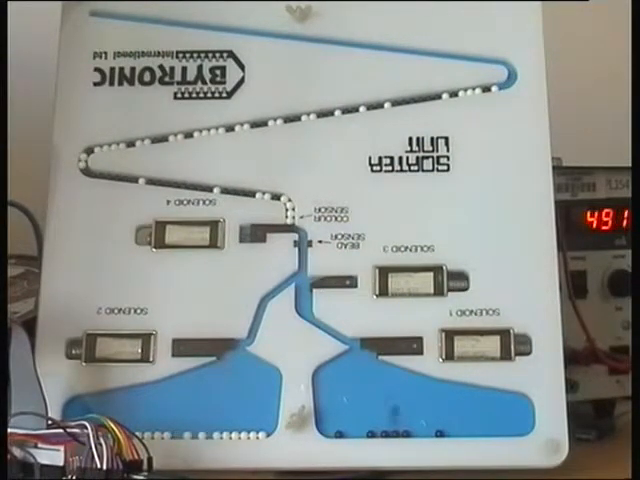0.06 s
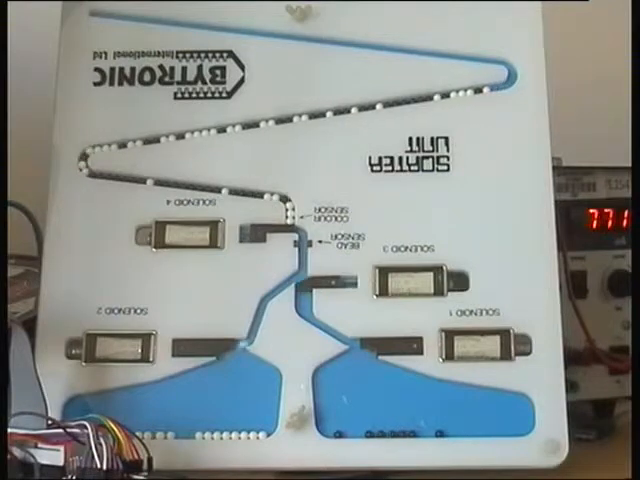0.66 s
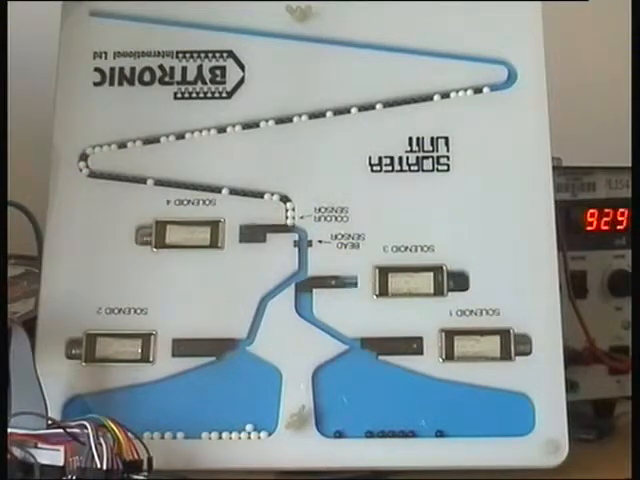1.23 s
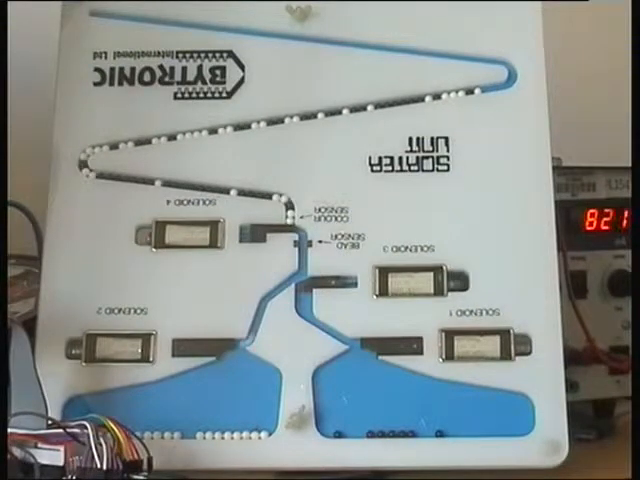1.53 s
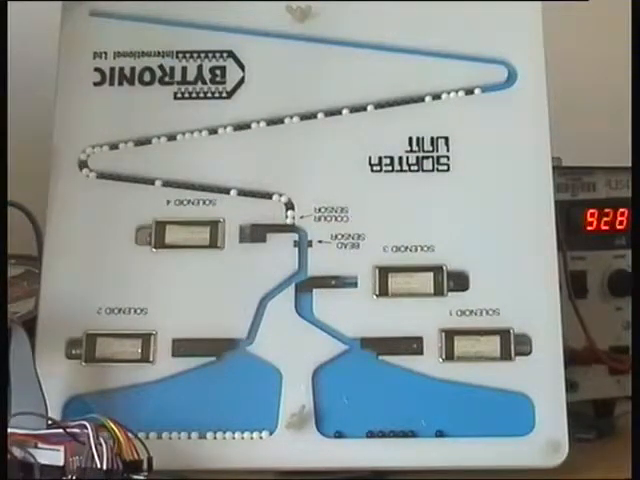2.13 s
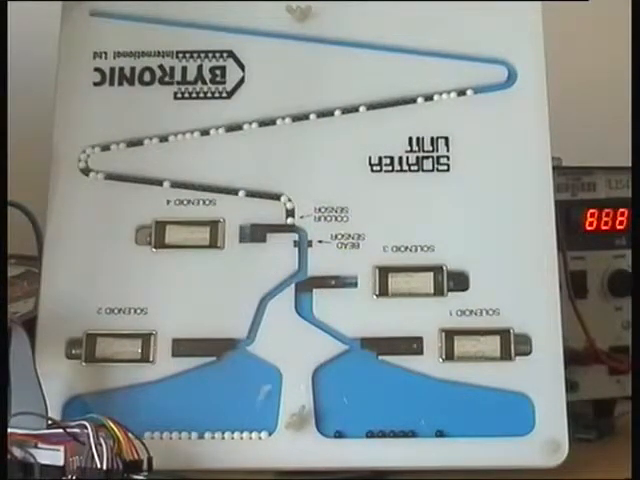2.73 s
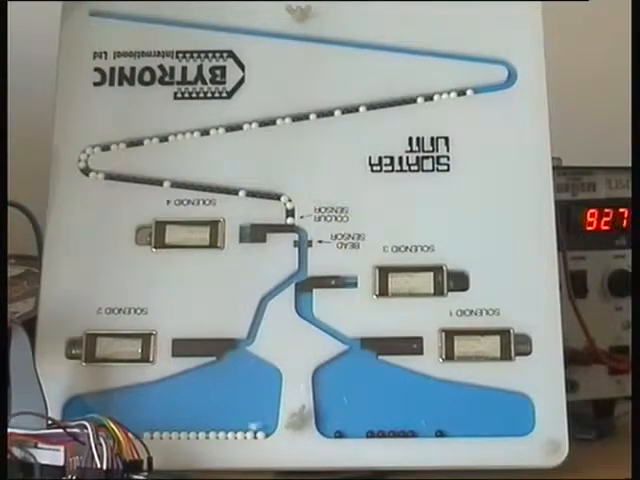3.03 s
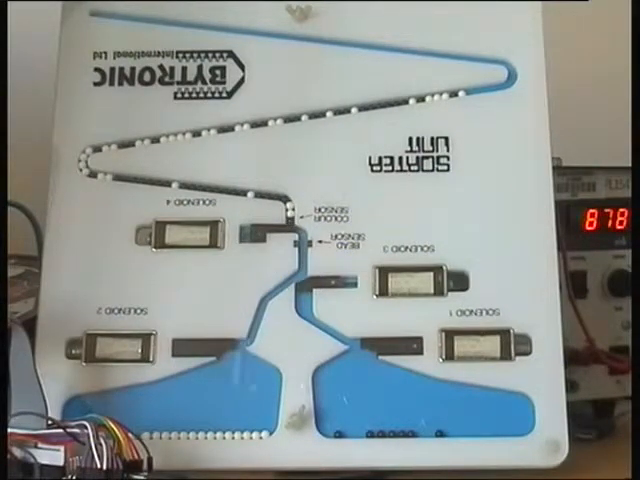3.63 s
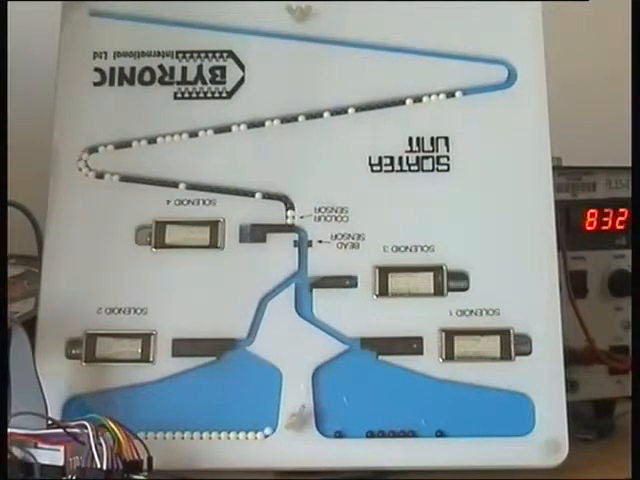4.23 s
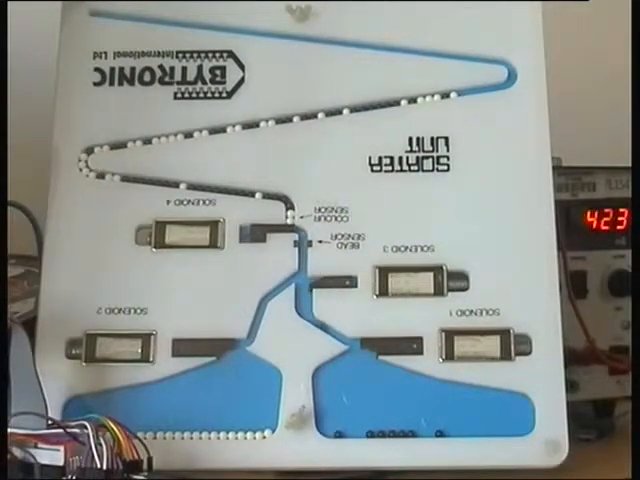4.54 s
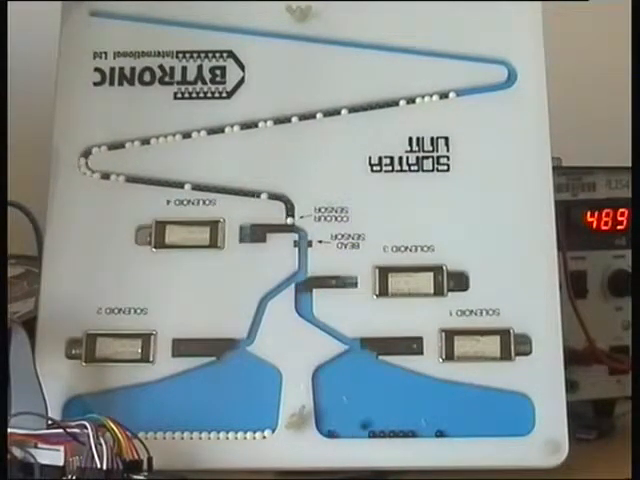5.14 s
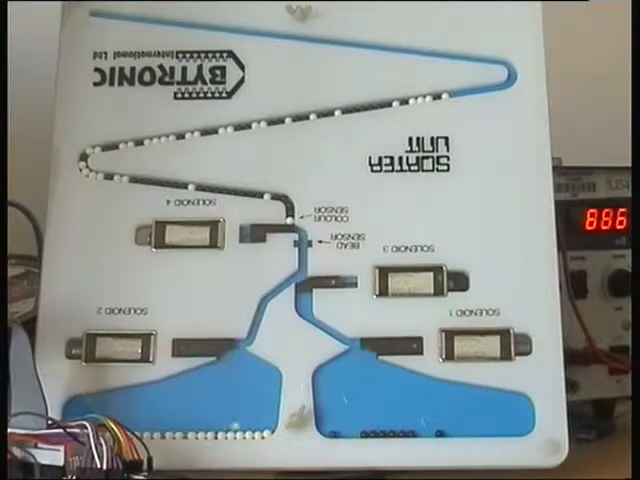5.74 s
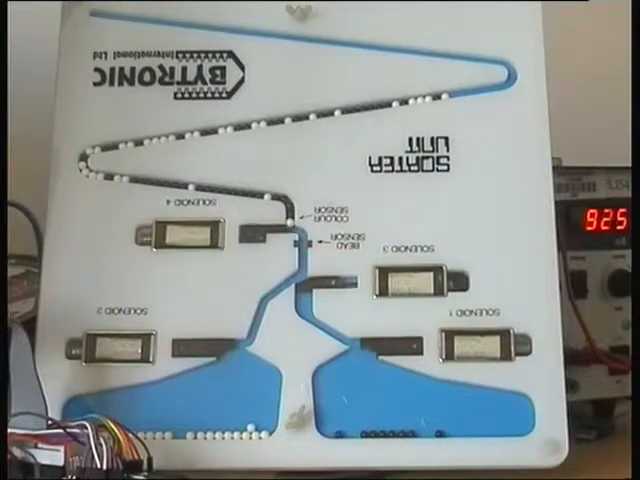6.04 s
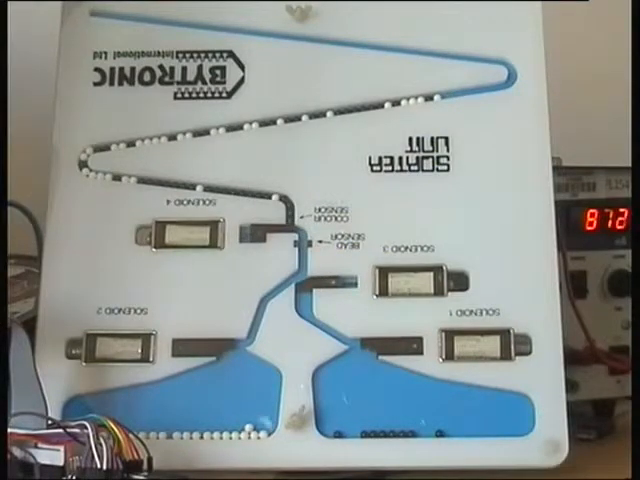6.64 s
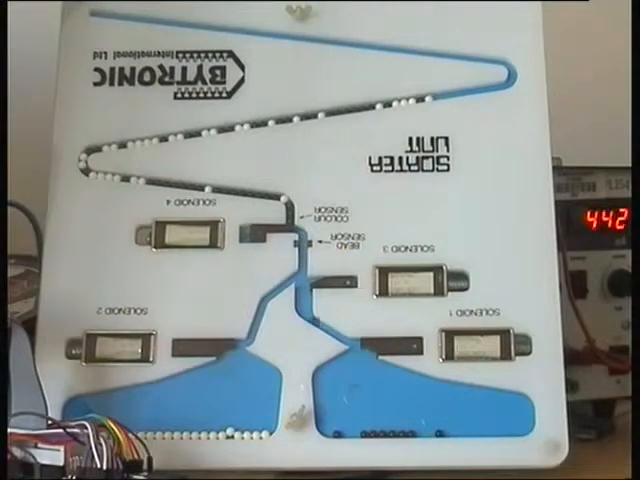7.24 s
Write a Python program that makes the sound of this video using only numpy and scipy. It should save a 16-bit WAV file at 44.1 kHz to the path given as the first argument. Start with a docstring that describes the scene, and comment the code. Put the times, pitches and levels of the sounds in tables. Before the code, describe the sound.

Over the faint, steady hum and hiss of a power supply and fan, a solenoid snaps roughly once a second in a small room. Each snap is joined by a quick knock from a sorting gate and is usually answered a third of a second later by a briefly ringing steel click. Much quieter, tiny beads jostle as they wait and drop into bins with bright, bouncing ticks.

```python
"""A solenoid (a coil that pulls in a steel plunger) slams home about once a second in a bead sorter.
A sorting gate then knocks against the plastic board, and the plunger, unless it is held in, springs back
with a short steel ring. Twice, a steely clack like that release sounds together with the slam.
Small beads jostle in a queue and bounce in the bins. The machine stands on a bench in a small room,
where a power supply and a fan hum under a faint hiss."""
import sys
import numpy as np
from scipy import signal
from scipy.fft import rfft, irfft, next_fast_len
from scipy.io import wavfile
from scipy.ndimage import uniform_filter1d

SR = 44100
rng = np.random.default_rng(int(sys.argv[2]) if len(sys.argv) > 2 else 0)


def digitize_waveform(pressure):
    """Quantize a signal to 16-bit integers and store it at the path in sys.argv[1].

    Rows of a 2-D input are taken as channels; values are limited to [-1, 1].
    """
    field = np.atleast_2d(pressure).T
    bounded = np.clip(field, -1, 1)
    quanta = np.round(bounded * 32767).astype(np.int16)
    wavfile.write(sys.argv[1], SR, quanta)


N = 321048

# Levels in dB are relative. A fade time (t60) is how long a sound takes to drop by 60 dB.
# The tones of the hum. Each row: pitch in Hz, level in dB.
HUM_TONES = [(81, -84), (242, -84), (301.5, -71.5), (511, -77), (598, -79.5), (899, -76.5), (937, -73.5),
             (1200, -84), (4697, -76)]
# Two close pitches in Hz that throb against each other.
THROB_HZ = (120, 121.37)
# How long the room echoes. Each row: frequency in Hz, fade time in seconds.
ROOM_FADE = [(150, 0.31), (500, 0.21), (2000, 0.34), (5000, 0.32), (9000, 0.27), (14000, 0.25)]
# How wide the hiss, the echo and the direct sound are.
# Each row: frequency in Hz, level of the sides against the middle in dB.
HISS_WIDTH = [(100, -13), (500, -7.5), (1500, -4), (6000, 0.5)]
ROOM_WIDTH = [(300, -22), (700, -10.5), (1500, -4.5), (5000, -1.5), (13000, -3)]
DIRECT_WIDTH = [(300, -24), (1000, -24), (3000, -18), (8000, -6), (13000, -8)]
# Where the direct sound leans. Each row: frequency in Hz, left against right in dB.
LEFT_LEAN = [(100, 1.5), (400, 2), (1300, 1), (4400, -0.5), (8500, -1.5), (10500, 0.5), (12400, 3)]

# The tone colour of each sound, from bass to treble. Each row: frequency in Hz, level in dB.
HISS_COLOUR = [(15, -54), (25, -14), (116, -6), (178, -7), (410, -3), (648, -9), (945, -7.5), (2120, -13.5),
               (2300, -17.5), (2490, -15), (4620, -12.5), (5730, -24), (9550, -17), (13200, -28),
               (15500, -48)]
QUEUE_COLOUR = [(1000, -14.5), (4000, -11), (7000, -7), (13000, -11.5), (15000, -26)]
BEAD_COLOUR = [(30, -44), (1200, -15), (2200, -12.5), (4000, -9.5), (6500, -2.5), (10000, 3), (11300, -7.5),
               (13000, 1), (15000, -29)]
GATE_COLOUR = [(30, -11), (100, -16.5), (280, -7), (420, -2.5), (800, 2.5), (1300, -2), (2800, -4),
               (5000, 3), (8000, 0.5), (11300, -11), (13000, 0.5), (15000, -31)]
SCRAPE_COLOUR = [(100, -16), (500, -1.5), (1800, 2.5), (3500, -1), (8000, -3.5), (11300, -8), (13000, -10),
                 (15000, -30)]
RELEASE_COLOUR = [(30, -18.5), (100, -29.5), (280, -24), (420, -13.5), (800, -3), (1300, -13.5),
                  (2800, -10.5), (5000, -1), (8000, 0), (11300, -6), (13000, 2), (15000, -27)]
PULL_COLOUR = [(30, -39), (100, -24), (280, -23.5), (420, -28), (800, -6), (1300, -3.5), (2800, -3.5),
               (5000, 1), (8000, 1.5), (11300, -6.5), (13000, -5), (15000, -22)]
# Modes are the pitches at which a struck part rings. Each row: pitch in Hz, width in Hz, boost in dB.
QUEUE_MODES = [(6940, 1600, 5)]
PING_MODE = (6900, 2000, 15)  # a single row: one bead against the next
BEAD_MODES = [(2090, 420, 4.6), (2400, 440, 6), (3230, 800, 5.6), (6380, 1100, 5.8)]
GATE_MODES = [(386, 79, 11.3), (475, 115, 10.9), (760, 96, 5.3), (1087, 38, 9.9), (1327, 62, 7.6),
              (1655, 230, 7.6), (2003, 61, 5.2), (3480, 340, 6.6), (10050, 1430, 8)]
LATE_RELEASE_MODES = [(2810, 260, 8.5), (3460, 340, 16), (3790, 130, 13.5), (7380, 600, 5), (12260, 490, 9)]
RELEASE_MODES = [(232, 250, 6.5), (1025, 58, 4.8), (1563, 460, 10.1), (1995, 85, 6.4), (2230, 210, 6.1),
                 (2500, 160, 6.3), (3397, 350, 8.1), (3534, 425, 7), (3820, 210, 9.1), (4470, 73, 9.5),
                 (7450, 380, 4.1), (8984, 140, 8.9), (12120, 420, 8.7)]
PULL_MODES = [(403, 127, 26), (516, 72, 4), (700, 41, 5.5), (770, 146, 6.5), (1970, 170, 6.5),
              (2198, 94, 5.5), (2820, 190, 3.5), (3320, 600, 6), (3740, 57, 7.5), (4110, 230, 2),
              (4490, 330, 4), (6850, 670, 4.5), (13200, 200, 1)]
# Steel that rings on: the plunger with its spring, and the solenoid's frame.
# Each row: pitch in Hz, level in dB, fade time in seconds.
PLUNGER_RING = [(3335, -21, 0.19), (3540, -10, .24), (3705, -6, 0.14), (3820, 1.5, 0.27), (3940, -8, 0.28),
                (4100, -10, 0.35), (5000, -14, 0.18), (5760, -13, .2), (7250, -14, 0.18), (7540, -19, 0.11),
                (12200, 0, .1), (12200, -4, .1)]
FRAME_RING = [(1810, -1.5, 0.16), (3515, -5, 0.11), (3870, -6, 0.2), (4520, -5, .2), (4810, 2, 0.21),
              (4730, 0, 0.16), (5460, -18, 0.086), (6860, -24, 0.1), (7300, -27, 0.12), (7800, -3, 0.15),
              (7500, -3, 0.12)]
# A blow, then its repeats from rebounds and off the bench. Each row: delay in seconds, level in dB.
REPEATS = [(0, -1), (.0031, -2), (.0095, -8)]

# A bead runs into the waiting queue.
# Each row: start in seconds, click level in dB, shuffle level in dB, shuffle fade time in seconds.
NUDGES = [(0.0, -54, -54, 1.2), (0.497, -45, -58, 1.2), (4.295, -40, -52, 1.3), (4.373, -43, -58, 1),
          (4.451, -46, -63, 0.88), (4.639, -46, -56, .4), (4.6577, -37, -50, 0.35), (4.8192, -44, -54, 2),
          (5.259, -43, -52, 1), (6.7392, -37, -53, 0.92), (7.21, -40, -47, .6)]
# A sorted bead drops into its bin. Each row: start in seconds, level in dB, first flight in seconds,
# second flight as a share of the first, loss per bounce in dB, rattle in seconds, bass boost in dB.
DROPS = [(0.0794, -32, .0976, .735, 3, 0, 7), (0.8003, -23.5, .145, .578, 7, .15, 2),
         (1.7862, -25, .1393, .416, 6, .15, 1), (2.7306, -25.5, .152, .697, 6, 0, -6),
         (3.704, -24, .1405, .545, 9, .06, -2), (4.7618, -25, .1652, .765, 1.5, 0, 0),
         (5.6063, -28.5, .0917, .772, 4.5, .04, 0), (6.5207, -26.5, .129, .695, 9, 0, 1),
         (7.2058, -29, .14, .6, 6, 0, 5)]
# One sorting cycle per bead. Each row: start in seconds, slam level in dB, gate level in dB,
# treble boost in dB, kind ("white" is plain, "dark" adds a steely clack, "hold" keeps the plunger in).
CYCLES = [(0.2866, -10, -11, -4.5, "dark"), (1.2505, -5, -8, -4.5, "white"),
          (2.2121, -5.5, -7, -3, "white"), (3.1742, -6, -7.5, 0.5, "white"), (4.136, -5, -8, -5.5, "hold"),
          (5.076, -8, -10.5, -3, "dark"), (6.0405, -5, -7.5, -3, "white"),
          (7.0028, -4.5, -8.5, -4.5, "hold")]
GATE_LAG_S, RELEASE_LAG_S = 0.0667, 0.3418  # after the slam
DARK_DELAY_S = 0.003  # both come this much later in a "dark" cycle


def amp(db):
    """Turn decibels into a factor to multiply by."""
    return 10 ** (np.asarray(db) / 20)


def unit(x):
    """Scale a signal to an average (rms) level of 1."""
    return x / np.sqrt(np.mean(x ** 2) + 1e-20)


def along(points, hz):
    """Read between the rows of a table, on a logarithmic frequency scale."""
    frequencies, values = np.transpose(points)
    return np.interp(np.log(hz + 1), np.log(frequencies + 1), values)


def filtered(x, response):
    """Turn each frequency up or down by the factor response(hz)."""
    length = x.shape[-1]
    padded = next_fast_len(length + SR // 10)
    return irfft(rfft(x, padded) * response(np.fft.rfftfreq(padded, 1 / SR)), padded)[..., :length]


def add(track, start_s, x):
    """Mix a sound into the track at a given time."""
    start = max(round(start_s * SR), 0)
    part = x[..., :N - start]
    track[..., start:start + part.shape[-1]] += part


def stereo(pair, width):
    """Make left and right from two signals: one for the middle, one for the sides."""
    side = filtered(pair[1], lambda hz: amp(along(width, hz)))
    return np.array([pair[0] + side, pair[0] - side])


def body(x, colour, modes, size=4096):
    """A struck part colours the sound and rings at its modes."""
    hz = np.fft.rfftfreq(size, 1 / SR)
    peaks_db = sum(boost / (1 + (2 * (hz - pitch) / width) ** 2) for pitch, width, boost in modes)
    cepstrum = irfft(np.log(amp(along(colour, hz) + peaks_db)))
    # Folding the second half onto the first puts all the ringing after the hit.
    cepstrum[1:size // 2] *= 2
    cepstrum[size // 2 + 1:] = 0
    response = irfft(np.exp(rfft(cepstrum)))
    return signal.oaconvolve(x, response[None] / np.linalg.norm(response), axes=1)[:, :N]


def clatter(envelope, passes=4):
    """Two bursts of noise, evened out in pitch and in time, whose loudness follows the envelope."""
    burst = rng.standard_normal((2, len(envelope)))
    for _ in range(passes):
        spectrum = rfft(burst * envelope)
        even = irfft(spectrum / (np.abs(spectrum) + 1e-12), len(envelope))
        burst = even / np.sqrt(np.abs(uniform_filter1d(even ** 2, size=64)) + 1e-20)
    return burst * envelope


def blows(hits, t60, rise_s, repeat_db, bass_hz, treble_hz=10500):
    """Each hit is a short clatter with repeats; how the part seats sets its bass and treble."""
    track, t = np.zeros((2, N)), np.arange(SR // 10) / SR
    power = 0
    for k, (delay, db) in enumerate(REPEATS):
        age = np.maximum(t - delay, 0)
        fade = amp(db + repeat_db * (k > 0) - 60 * age / t60)
        power += (fade * (1 - np.exp(-age / rise_s))) ** 2
    for start, db, bass_db, treble_db in hits:
        bass = lambda hz: 1 + (amp(bass_db) - 1) / (1 + 1j * hz / bass_hz)
        treble = lambda hz: amp(treble_db * (1 - 1 / (1 + (hz / treble_hz) ** 8)))
        add(track, start, amp(db) * filtered(clatter(np.sqrt(power)), lambda hz: bass(hz) * treble(hz)))
    return track


def ringing(hits, tones):
    """Struck steel rings on, at slightly different pitches and strengths each time."""
    track, t = np.zeros((2, N)), np.arange(SR // 3) / SR
    for start, db, *_ in hits:
        for hz, tone_db, t60 in tones:
            phase = 2 * np.pi * (hz * rng.normal(1, 0.00204) * t + rng.random((2, 1)))
            fade = amp(db + tone_db + rng.normal(0, 0.75) - 60 * t / t60)
            add(track, start, fade * np.sin(phase))
    return track


def in_room(pair, echo_db, build_s):
    """The direct sound plus the room's soft echo, which builds up over about build_s seconds."""
    heard = filtered(stereo(pair, DIRECT_WIDTH),
                     lambda hz: amp(np.outer([0.5, -0.5], along(LEFT_LEAN, hz))))
    for start in range(0, N, SR):  # each second gets a fresh echo made of fading noise
        hz, t, noise = signal.stft(rng.standard_normal((2, SR // 3)), SR, nperseg=256)
        tail = signal.istft(noise * amp(-60 * t / along(ROOM_FADE, hz)[:, None]), SR, nperseg=256)[1]
        tail *= 1 - np.exp(-(np.arange(tail.shape[1]) / SR / build_s) ** 2)
        tail = stereo(tail / np.linalg.norm(tail[0]), ROOM_WIDTH)
        echo = signal.fftconvolve(pair[:1, start:start + SR], tail, axes=1)
        add(heard, start / SR, amp(echo_db) * echo)
    return heard


def hum_and_hiss(waver_cycles=0.28, throb_db=-73):
    """The power supply and a fan hum under an even hiss; two close low tones throb together."""
    t = np.arange(N) / SR
    hiss = unit(filtered(rng.standard_normal((2, N)), lambda hz: amp(along(HISS_COLOUR, hz))))
    hum = np.zeros(N)
    for hz, db in [*HUM_TONES, *[(hz, throb_db) for hz in THROB_HZ]]:
        drift = np.interp(t, np.linspace(0, t[-1], 40), rng.standard_normal(40))
        hum += amp(db) * np.sqrt(2) * np.sin(2 * np.pi * (hz * (t - 0.14) + waver_cycles * drift))
    return amp(-60.5) * stereo(hiss, HISS_WIDTH) + hum


def queue_motion(rest_db=-62.5):
    """How much the waiting beads move: each nudge stirs them up, and they never quite rest."""
    power, t = np.full(N, amp(rest_db) ** 2), np.arange(SR) / SR
    for start, _, db, t60 in NUDGES:
        add(power, start, amp(db - 60 * t / t60) ** 2)
    return np.sqrt(power)


def queue_jostle(motion, per_second=240, t60=0.021):
    """The waiting beads rustle as they touch in many tiny contacts."""
    contacts = (rng.random(N) < per_second / SR) * rng.uniform(-0.66, 1, N)
    touch = clatter(amp(-60 * np.arange(SR // 50) / SR / t60))
    rustle = unit(signal.fftconvolve(contacts[None], touch, axes=1)[:, :N])
    return body(amp(-6) * motion * rustle, QUEUE_COLOUR, QUEUE_MODES)


def queue_pings(motion, per_second=45, t60=0.008, roll_db=-7, click_db=1):
    """Beads knock together with a tiny ping: once at each nudge, then at random as they roll on."""
    knocks = (rng.random(N) < per_second / SR) * rng.uniform(0.5, 1, N)
    knocks *= amp(roll_db) * np.sqrt(SR / per_second) * motion
    touch = clatter(amp(-60 * np.arange(SR // 50) / SR / t60))
    track = signal.oaconvolve(np.array([knocks, knocks]), touch / np.linalg.norm(touch[0]), axes=1)[:, :N]
    for start, db, *_ in NUDGES:
        add(track, start, amp(db + click_db) * touch)
    return body(track, BEAD_COLOUR, [PING_MODE])


def bin_bounces(hop_s=0.034, hop_loss_db=2.1):
    """A bead lands and bounces twice; some then hop over the others in the bin, weaker each hop."""
    contacts = []
    for start, db, flight, shrink, loss_db, rattle_s, bass_db in DROPS:
        contacts += [(start, db, bass_db), (start + flight, db - loss_db, bass_db)]
        third_landing = start + flight * (1 + shrink)
        for hop in range(int(rattle_s / hop_s) + 1):
            contacts.append((third_landing + hop * hop_s, db - 2 * loss_db - hop * hop_loss_db, bass_db))
    hits = [(start, db, bass_db, 0.33 * (db + 32))  # harder hits are brighter
            for start, db, bass_db in contacts if start < N / SR]
    ticks = amp(-5) * blows(hits, t60=0.014, rise_s=0.00034, repeat_db=-3, bass_hz=3550)
    return body(ticks, BEAD_COLOUR, BEAD_MODES)


def beads():
    """Waiting beads rustle and ping, and falling ones tick sharply."""
    motion = queue_motion()
    sound = queue_jostle(motion) + bin_bounces() + queue_pings(motion)
    return in_room(sound, echo_db=-2, build_s=0.0012)


def gate_knock(bass_db=0, brighter_db=3):
    """Just after each slam the sorting gate stops against the board, which gives a hollow knock."""
    hits = [(start + GATE_LAG_S + DARK_DELAY_S * (kind == "dark"), db,
             bass_db, treble_db + brighter_db * (kind != "dark"))
            for start, _, db, treble_db, kind in CYCLES]
    force = amp(-9.5) * blows(hits, t60=0.04, rise_s=0.00014, repeat_db=-2, bass_hz=1510)
    return in_room(body(force, GATE_COLOUR, GATE_MODES), echo_db=-3.5, build_s=0.0021)


def late_release(level_db=-4, bass_db=1.5, treble_db=1.2):
    """In a "dark" cycle a short, steely clack like the plunger's release sounds with the slam."""
    hits = [(start, level_db, bass_db, treble_db) for start, *_, kind in CYCLES if kind == "dark"]
    force = amp(-5) * blows(hits, t60=0.024, rise_s=0.00035, repeat_db=-2, bass_hz=1500)
    clack = body(force, RELEASE_COLOUR, LATE_RELEASE_MODES)
    ring = amp(-42) * ringing(hits, PLUNGER_RING)
    return in_room(clack + ring, echo_db=-8, build_s=0.0038)


def plunger_scrape(hits, lead_s, t60):
    """The plunger breaks loose and scrapes along its tube just before each hit."""
    track, t = np.zeros((2, N)), np.arange(round(lead_s * SR)) / SR
    for start, db, *_ in hits:
        add(track, start - lead_s, amp(db - 60 * t / t60) * rng.standard_normal((2, len(t))))
    return body(track, SCRAPE_COLOUR, [])


def solenoid_release(level_db=-4, bass_db=-1.9, treble_db=0.9):
    """A timer frees the plunger unless it is held; the spring throws it out, always equally hard."""
    hits = [(start + RELEASE_LAG_S + DARK_DELAY_S * (kind == "dark"), level_db, bass_db, treble_db)
            for start, *_, kind in CYCLES if kind != "hold"]
    force = amp(-3.5) * blows(hits, t60=0.016, rise_s=0.00041, repeat_db=-0.5, bass_hz=1540)
    clack = body(force, RELEASE_COLOUR, RELEASE_MODES)
    ring = amp(-36.5) * ringing(hits, PLUNGER_RING)
    scrape = amp(-37.5) * plunger_scrape(hits, lead_s=0.038, t60=0.25)
    return in_room(clack + ring + scrape, echo_db=-5, build_s=0.0014)


def solenoid_pull(dark_bass_db=3, dark_treble_db=7):
    """The coil slams the plunger against its stop, and the frame rings."""
    hits = [(start, db, dark_bass_db * (kind == "dark"), treble_db + dark_treble_db * (kind == "dark"))
            for start, db, _, treble_db, kind in CYCLES]
    # A plunger that is held in strikes a second time: softer, with less bass and more treble.
    hits += [(start + 0.0065, -10, -2, 4) for start, *_, kind in CYCLES if kind == "hold"]
    force = amp(-6.5) * blows(hits, t60=0.024, rise_s=0.00029, repeat_db=-1, bass_hz=1510)
    slam = body(force, PULL_COLOUR, PULL_MODES)
    ring = amp(-32) * ringing(hits, FRAME_RING)
    scrape = amp(-29) * plunger_scrape(hits, lead_s=0.011, t60=0.068)
    return in_room(slam + ring + scrape, echo_db=-1.5, build_s=0.0017)


def scene():
    """The machine and its beads over the hum and hiss."""
    machine = solenoid_pull() + late_release() + gate_knock() + solenoid_release()
    return machine + beads() + hum_and_hiss()


def record(dry, ceiling=0.61, top_hz=15600):
    """Round off the tallest peaks and cut the very highest treble."""
    rounded = dry / (1 + (dry / ceiling) ** 4) ** (1 / 4)
    return filtered(rounded, lambda hz: 1 / np.sqrt(1 + (hz / top_hz) ** 120))


dry = scene()
out = record(dry)
digitize_waveform(out)
```